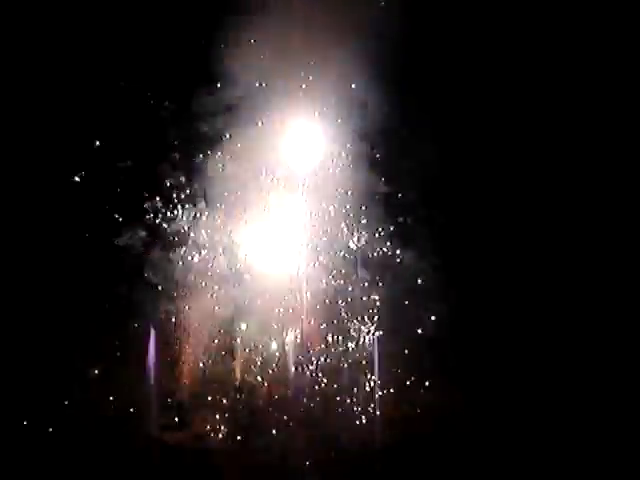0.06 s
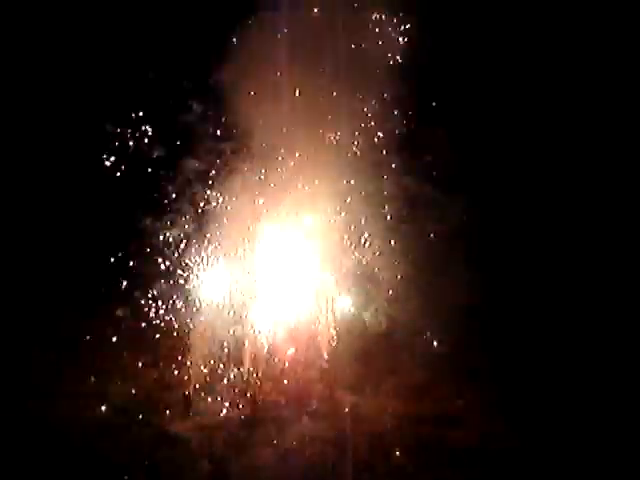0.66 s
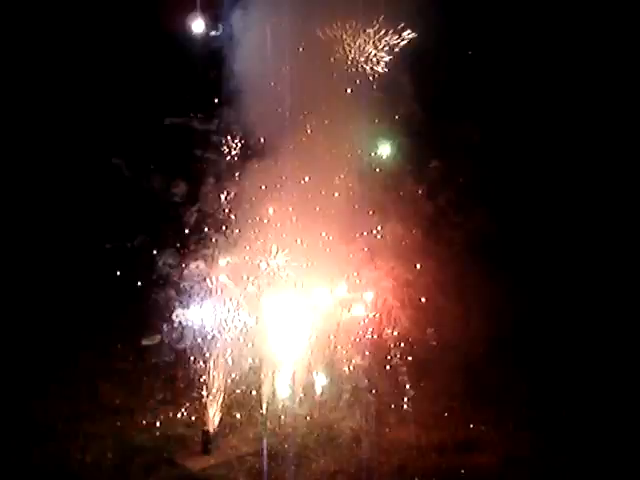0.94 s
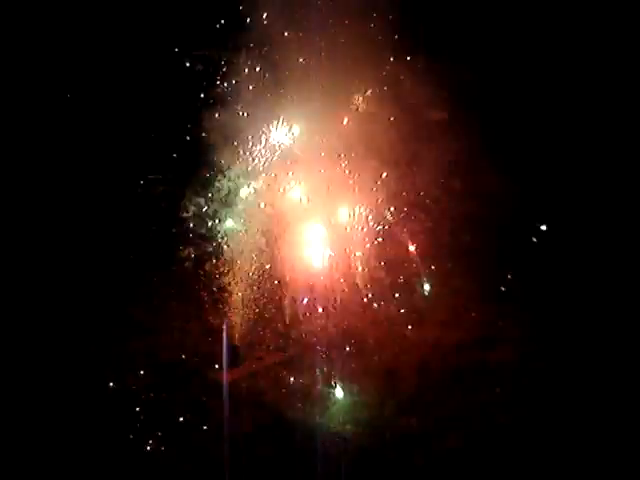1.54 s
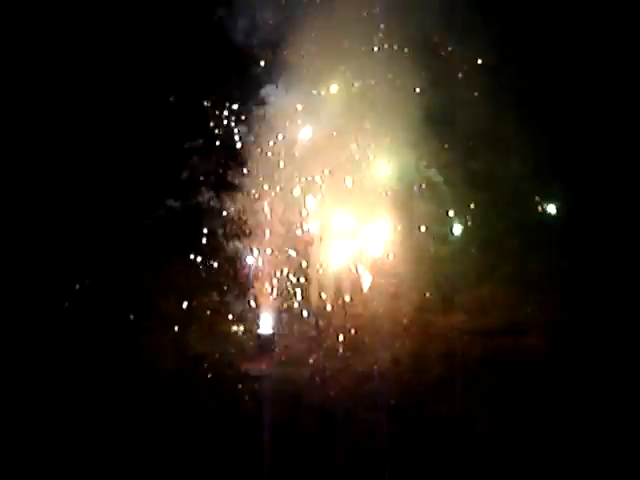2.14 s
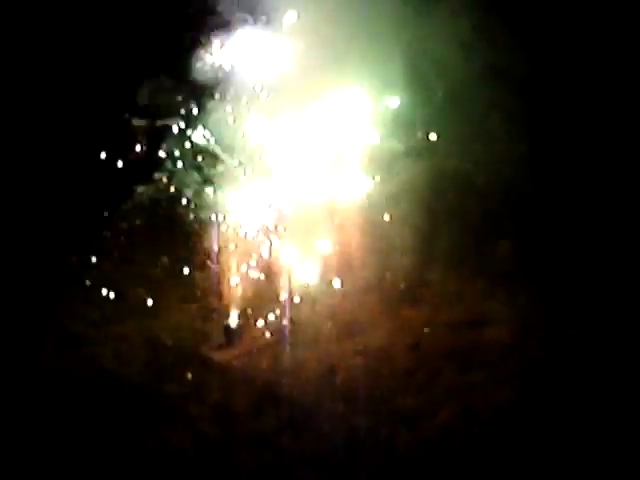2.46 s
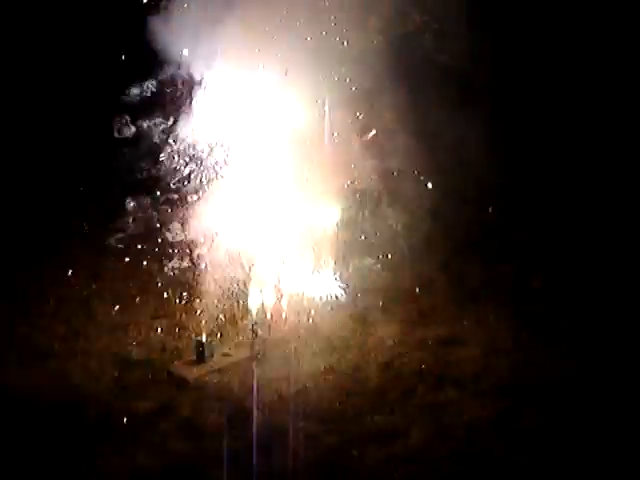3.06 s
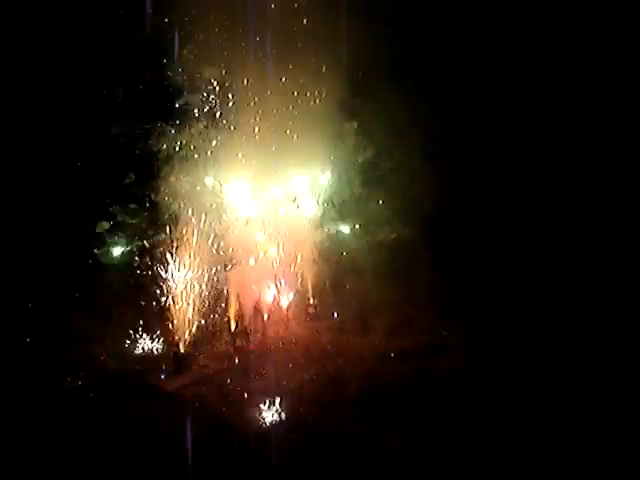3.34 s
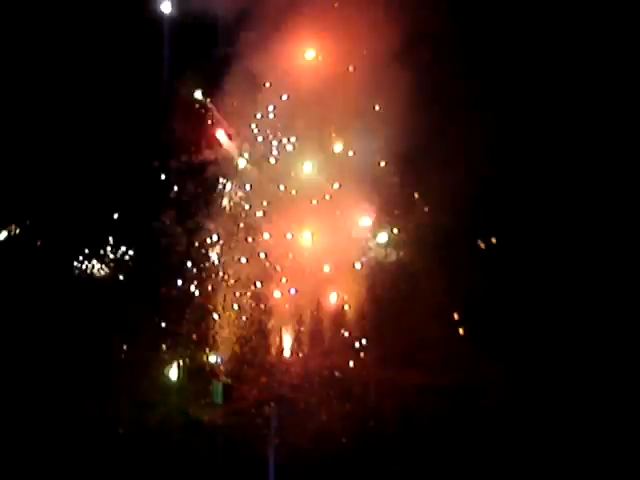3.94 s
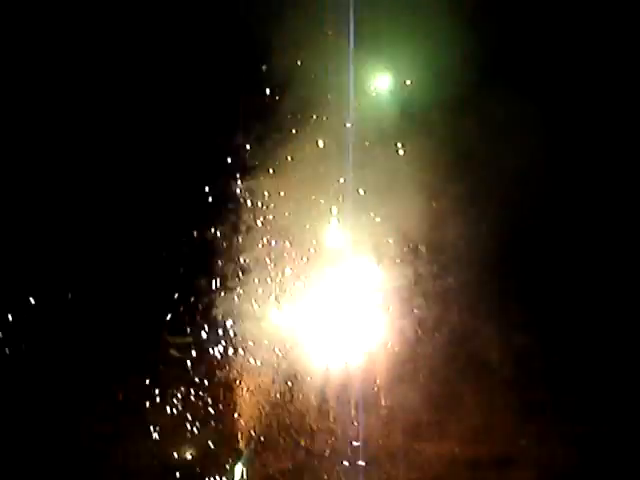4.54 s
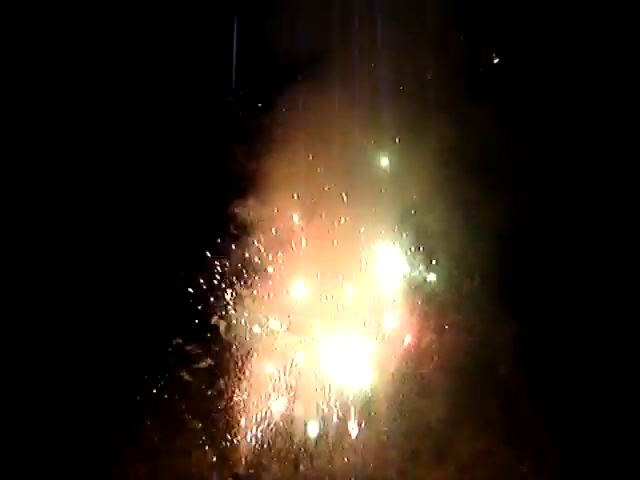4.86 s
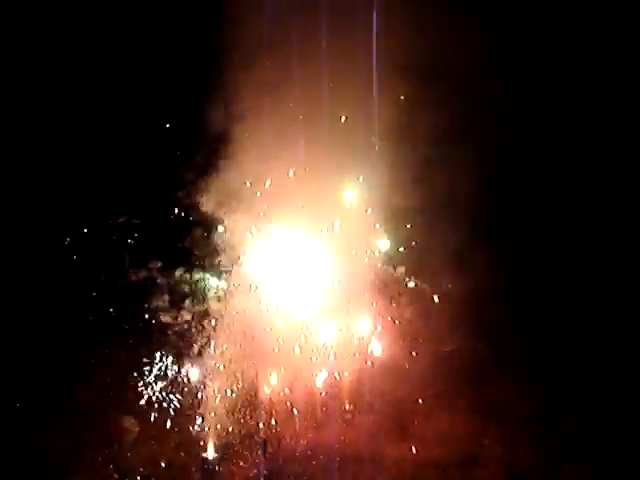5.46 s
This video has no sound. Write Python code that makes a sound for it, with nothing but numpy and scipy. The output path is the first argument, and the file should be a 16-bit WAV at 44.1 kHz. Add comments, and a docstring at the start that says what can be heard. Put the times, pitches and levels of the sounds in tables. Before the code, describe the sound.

Three piercing firework whistles slide down in pitch, followed by louder fountain hiss and rapid, sharp crackling outdoors.

```python
"""Ground fireworks on a lawn at night, a few metres from a small camera's mono microphone.
A whistling tube shrieks at once, sinking in pitch as its fuel burns down, over the hiss of fountains.
Crackling stars pop, each a tiny explosion. From 1.6 s to 3.3 s two more tubes whistle, overlapping.
From 4 s the fountains grow louder and the pops crowd together. Houses and trees return the echoes."""
import sys
import numpy as np
from scipy import signal
from scipy.fft import rfft, irfft, next_fast_len
from scipy.io import wavfile
from scipy.ndimage import uniform_filter1d, map_coordinates

SR = 44100
rng = np.random.default_rng(int(sys.argv[2]) if len(sys.argv) > 2 else 0)


def file_out(sig):
    """Save sig as 16-bit WAV at sys.argv[1]."""
    # one column per channel
    cols = np.atleast_2d(sig).T
    # limit, then scale
    lim = np.clip(cols, -1, 1)
    pcm = np.round(lim * 32767).astype(np.int16)
    wavfile.write(sys.argv[1], SR, pcm)


N = 251811


def amp(db):
    """Decibels as an amplitude factor."""
    return 10 ** (np.asarray(db) / 20)


def unit(x):
    """x scaled to an RMS of one."""
    return x / np.sqrt(np.mean(x ** 2) + 1e-20)


def along(points, hz):
    """Interpolates (f/Hz, value) points on a log frequency axis."""
    f, values = np.transpose(points)
    return np.interp(np.log(hz + 1e-6), np.log(f), values)


def wobble(rate):
    """A smooth random curve, rate knots a second."""
    return map_coordinates(rng.standard_normal(int(N * rate / SR) + 4), [np.arange(N) * rate / SR])


def fuzzy_tone(phase, width_hz):
    """An oscillation of random strength and phase, about width_hz wide."""
    return (wobble(width_hz) * np.sin(phase) + wobble(width_hz) * np.cos(phase)) / np.sqrt(2)


def filtered(x, response):
    """x through a zero-phase filter whose gain is response(hz)."""
    size = next_fast_len(len(x) + SR // 2)
    return irfft(rfft(x, size) * response(np.fft.rfftfreq(size, 1 / SR)), size)[:len(x)]


def coloured(x, points, size=4096):
    """x through a causal filter with the given (f/Hz, gain/dB) points."""
    gain = amp(along(points, np.fft.rfftfreq(size, 1 / SR)))
    cepstrum = irfft(np.log(gain))
    cepstrum[1:size // 2] *= 2
    cepstrum[size // 2 + 1:] = 0
    return signal.fftconvolve(x, irfft(np.exp(rfft(cepstrum))))[:N]


def patchy(x, depth_db):
    """Narrow bands of the hiss brighten and dim at random."""
    spectra = signal.stft(x, nperseg=512)[2]
    patches = uniform_filter1d(rng.standard_normal(spectra.shape), size=3, axis=0)
    patches = uniform_filter1d(patches, size=18, axis=1)
    return signal.istft(spectra * amp(depth_db * unit(patches)), nperseg=512)[1][:N]


def background():
    """A low hum, a rumble and a faint, thin high hiss whose level wavers at random."""
    # steady hum tones: f/Hz, level/dB
    hum_tones = [(29, -64.5), (60, -66)]
    t = np.arange(N) / SR
    hum = sum(amp(db) * np.sqrt(2) * np.sin(2 * np.pi * hz * t) for hz, db in hum_tones)
    rumble = coloured(rng.standard_normal(N), [(30, -12), (150, -25.5), (1000, -44)])
    waver_db = 4.5 * wobble(49)
    hiss = coloured(rng.standard_normal(N), [(2000, -28.5), (6000, 4.5), (10000, -11), (12000, -42)])
    return hum + amp(-63.5) * unit(rumble) + amp(-58.5 + waver_db) * unit(hiss)


def yard(x):
    """Houses and trees around the lawn answer; each frequency dies at its own speed."""
    # reverberation of the yard: f/Hz, time to fall 60 dB/s
    decay_times = [(150, 0.19), (1000, 0.7), (4000, 0.52), (10000, 0.17)]
    hz, t, spectra = signal.stft(rng.standard_normal(SR // 2), SR, nperseg=256)
    decay = amp(-60 * t / along(decay_times, hz)[:, None])
    tail = signal.istft(spectra * decay, SR, nperseg=256)[1]
    return signal.fftconvolve(x, np.pad(tail, (600, 0)) / np.linalg.norm(tail))[:N]


def wall(x, delay_s, blur_t60):
    """One slightly blurred echo from a house front."""
    t = np.arange(SR // 8) / SR
    blur = rng.standard_normal(len(t)) * amp(-60 * t / blur_t60)
    return signal.fftconvolve(x, np.pad(blur, (round(delay_s * SR), 0)) / np.linalg.norm(blur))[:N]


def fountain_db(follows, flaring):
    """A layer's dB over its usual level, following the fountains' level and flares by these factors."""
    # how loud the hiss and pops are heard, lower while the whistles sound: t/s, level/dB
    heard_levels = [(0, -43.5), (.75, -43.5), (1, -46), (1.5, -43), (1.7, -48.5), (2.1, -45), (2.4, -50),
                    (2.8, -45), (3.6, -47.5), (4.15, -44.5), (4.22, -41), (4.62, -41), (4.75, -39),
                    (4.98, -42), (5.15, -37), (5.5, -37.5), (5.71, -35.5)]
    # flares as clusters of stars catch: peak t/s, gain/dB, rise/s, fall/s
    flares = [(1.24, 6, .04, .06), (4.335, 3.5, 0.034, .04), (4.481, 2.5, .025, .03),
              (4.87, 5.5, .08, .045), (5.075, 4.5, .025, .05), (5.62, 4.5, .035, .07)]
    usual_db = -43.5
    t = np.arange(N) / SR
    heard_db = np.interp(t, *np.transpose(heard_levels))
    flare_db = sum(db * np.exp(-((t - peak) / np.where(t < peak, rise, fall)) ** 2)
                   for peak, db, rise, fall in flares)
    return follows * (heard_db - usual_db) + flaring * flare_db


def nozzles():
    """Each nozzle gives a breathy, narrow ring; the higher one stands out when the fountains are loud."""
    phase_per_hz = 2 * np.pi * np.arange(N) / SR
    lower = amp(-50 + fountain_db(follows=.4, flaring=.6)) * fuzzy_tone(2840 * phase_per_hz, 200)
    higher = amp(-55 + fountain_db(follows=1.5, flaring=.5)) * fuzzy_tone(3770 * phase_per_hz, 300)
    return np.sqrt(2) * (lower + higher)


def blasts(times, sizes, push_ms, samples=256):
    """Each tiny explosion is a sharp push of air and a longer suction."""
    age = np.arange(samples) * 1000 / SR / push_ms[:, None]  # in push lengths
    waves = sizes[:, None] * (1 - age) * np.exp(-age) * (1 - np.exp(-age / .1))
    at = np.round(times * SR).astype(int).clip(0)[:, None] + np.arange(samples)
    return np.bincount(at.ravel(), waves.ravel(), minlength=N)[:N]


def shower(count, spread_db, push_ms):
    """Times, sizes and push lengths of many random blasts."""
    when, size, length = rng.random((count, 3)).T
    return when * N / SR, amp(-spread_db * size), push_ms * 2 ** (2 * length - 1)


def fountain_spray():
    """The fountains' jets hiss unevenly, and countless sparks snap in them."""
    # colour of the jets and sparks: f/Hz, gain/dB
    hiss_colour = [(240, -20), (400, -13.5), (568, -0.5), (973, -6.5), (1520, -7), (2820, -5.5),
                   (3140, -6.5), (9600, -17.5), (10000, -22.5), (13000, -41.5), (22000, -120)]
    sparks = unit(blasts(*shower(count=3500, spread_db=7.5, push_ms=.048)))
    fizz = patchy(coloured(rng.standard_normal(N) + .46 * sparks, hiss_colour), depth_db=2.5)
    fizz = filtered(fizz, lambda hz: hz ** 2 / (hz ** 2 + 650 ** 2))  # low cut
    sputter_db = .9 * wobble(90)
    return amp(-37.7 + fountain_db(follows=.96, flaring=.86) + sputter_db) * unit(fizz)


def with_echoes(times, sizes, push_ms, echo_db, spread_s, count=8):
    """Each star bursts at its own place, so things close by return it at its own delays."""
    late, strength = rng.random((len(times), 2, count)).transpose(1, 0, 2)
    delays = .001 - spread_s * np.log(1 - late)
    echo_sizes = amp(echo_db) * sizes[:, None] * (2 * strength - 1) * np.sqrt(1 - late)
    echoes = blasts((times[:, None] + delays).ravel(), echo_sizes.ravel(), np.repeat(push_ms, count))
    return blasts(times, sizes, push_ms) + echoes


def lesser_stars(level_db, count):
    """Times, sizes and push lengths of random stars, denser and louder as the fountains grow louder."""
    gain_db = fountain_db(follows=.9, flaring=.4)
    tally = np.cumsum(amp(gain_db))
    when, sizes, push_ms = shower(count, spread_db=1.5, push_ms=.53)
    at = np.searchsorted(tally / tally[-1], when * SR / N).clip(0, N - 1)
    return at / SR, sizes * amp(level_db + gain_db[at]), push_ms


def crackling_stars():
    """Loud single stars and lesser ones burst over a stream of smaller, duller pops."""
    # loud stars: t/s, blast level/dB, length of the pressure push/ms
    loud_stars = [(0.2091, -15, 0.31), (0.2347, -12.5, .34), (1.0122, -17, 0.5), (1.0789, -14, .3),
                  (1.151, -16, 0.95), (1.2743, -10.5, .5), (1.306, -17.5, 0.46), (1.359, -14, 0.25),
                  (1.3654, -16, .44), (1.3945, -12.5, 0.6), (1.441, -17, 1), (1.5032, -4, 0.25),
                  (1.5086, -7.5, .32), (1.55, -17, 1), (1.7536, -9, 0.15), (2.7828, -19, 0.6),
                  (3.3676, -17, 0.67), (3.59, -18.5, 0.68), (3.665, -17, 0.42), (3.6988, -14, 0.58),
                  (3.7299, -10.5, 0.53), (3.8867, -15.5, .3), (3.974, -10, 0.51), (4.1285, -13.5, 0.26),
                  (4.1868, -10, 0.22), (4.2087, -1, 0.14), (4.213, -17, 1), (4.3559, -13, 0.4),
                  (4.4851, -11.5, 0.52), (4.555, -4, 0.34), (4.5702, -9.5, .55), (4.656, -1.5, .2),
                  (4.7445, -7.5, 0.63), (4.8362, -6, 0.27), (4.856, -9, 0.68), (4.8628, -4, 0.44),
                  (4.8946, -7, 0.42), (4.96, -6, 0.33), (5.0353, -8.5, 0.58), (5.085, -8, 0.65),
                  (5.106, -2, 0.11), (5.193, -3.5, 0.23), (5.293, -1, .36), (5.3027, -6.5, .28),
                  (5.351, -4.5, 0.23), (5.3737, -7, 0.53), (5.3877, -4, 0.32), (5.3963, -6.5, 0.65),
                  (5.421, -8.5, 0.51), (5.4375, -13, 0.59), (5.5503, -3.5, 0.33), (5.604, -5, .14),
                  (5.6389, 0, .11), (5.6764, -2, 0.26), (5.6801, -5.5, .75)]
    # a blast plus its bounce off the lawn, at the microphone: f/Hz, gain/dB
    lawn_bounce = [(40, -34), (90, -17), (140, -6), (290, 2.5), (430, -0.5), (570, -4), (930, 2),
                   (1400, -4), (2500, 0), (5000, 4), (10000, 1)]
    # small stars, dulled by grass and smoke: f/Hz, gain/dB
    dull_colour = [(40, -37), (90, -12.5), (150, -5), (280, 0), (420, -4.5), (570, -7), (900, 3),
                   (1400, -14), (2500, -16.5), (5000, -17.5), (10000, -32.5)]
    times, db, push_ms = np.transpose(loud_stars)
    loud = with_echoes(times, amp(db), push_ms, echo_db=-6, spread_s=.003)
    lesser = with_echoes(*lesser_stars(level_db=-20, count=80), echo_db=-6.5, spread_s=.0039)
    small = with_echoes(*shower(count=1000, spread_db=13, push_ms=.5), echo_db=-5, spread_s=.00513)
    stream = amp(-45.5 + fountain_db(follows=1, flaring=.71)) * unit(coloured(small, dull_colour))
    return coloured(loud + lesser, lawn_bounce) + stream


def whistle(tube, tone_db, rasp_db, jitter, waver, flutter_db):
    """Fuel burns in pulses at the tube's resonance, which sinks as the air column above it lengthens."""
    # rasp of the jet around the tone: f/pitch, gain/dB
    rasp_colour = [(.12, -34.5), (.2, -19.5), (.27, -26), (.4, -13.5), (.55, -9.5), (.7, -8), (.8, -1.5),
                   (.88, -2), (1, 0), (1.13, -8), (1.3, -12.5), (1.45, -4.5), (1.72, -19), (2, -17.5),
                   (2.25, -29)]
    (start, end, first_hz, last_hz, hold, droop, level_db,
     swell, fade, octave_db, mode_db, steepening, cold) = tube
    t = np.arange(N) / SR
    age, left = t - start, end - t
    lit = np.clip(age / .0021 + 1, 0, 1)
    weak_db = 5 * (np.clip(1 - age / swell, 0, 1) + np.clip(1 - left / fade, 0, 1))
    # the jet dies a moment before the tube stops ringing
    blowing = np.clip(left / .047, 0, 1)
    ringing = np.clip(left / .02 + 1, 0, 1)

    # the fuel burns down at a steady rate, so the period lengthens evenly
    burnt = np.clip((age - hold) / (end - start - hold), 0, 1)
    period = (1 - burnt) / first_hz + burnt / last_hz
    last_droop = 1 - droop * np.exp(-left.clip(0) / .032)
    warm_up = 1 - cold * .06 * np.exp(-age.clip(0) / .0025)  # a cold tube chirps up as its gas heats
    hz = last_droop / period * warm_up
    cycles = np.cumsum(hz * (1 + jitter * wobble(700) + waver * wobble(45))) / SR
    phase = 2 * np.pi * cycles

    # pulses alternate, more so in a cold or emptying tube: lines at 0.5 and 1.5 times the pitch
    uneven_db = octave_db + 5.5 * burnt + cold * 20 * np.exp(-age.clip(0) / .055)
    halves = amp(uneven_db) * (fuzzy_tone(phase / 2, 120) + amp(-4) * fuzzy_tone(1.5 * phase, 160))
    lower_mode = amp(mode_db) * fuzzy_tone(.81 * phase, 150)
    wave = np.sin(phase) + blowing * (halves + lower_mode)
    # the loud wave steepens, which adds the octave above and sum and difference tones
    wave = wave + steepening * filtered(wave ** 2, lambda f: f > 650)

    # turbulence rings the same tube, so its colour slides down with the tone
    jet = filtered(rng.standard_normal(N), lambda f: amp(along(rasp_colour, f / first_hz)))
    sliding_jet = map_coordinates(jet, [cycles * SR / first_hz])
    rasp = unit(patchy(sliding_jet, depth_db=.5))
    voice = amp(tone_db) * np.sqrt(2) * wave * ringing + amp(rasp_db) * rasp * blowing
    return lit * amp(level_db - weak_db + flutter_db * wobble(170)) * voice


def whistling_tubes():
    """Three tubes shriek; echoes off a near and a far house front make each flutter as it dies."""
    # tubes: lit t/s, spent t/s, first f/Hz, last f/Hz before the droop, pitch hold/s, droop/share,
    # gain/dB, swell/s, fade/s, octave below/dB, lower mode/dB, steepening/0-1, cold start/0-1
    tubes = [(-0.01, 0.752, 5024, 4107, 0.0011, 0, -20.5, 0.01, 0.025, -22, -21, 0.11, 0.45),
             (1.564, 2.54, 4849, 4016, 0.055, .022, -19.5, 0.0029, 0.37, -27, -18, .18, 0.99),
             (2.282, 3.338, 5176, 4245, 0.15, .035, -20.5, 0.44, 0.0067, -25.5, -15.5, 0.1, 0)]
    shriek = sum(whistle(tube, tone_db=5, rasp_db=-3.5, jitter=.0107, waver=.0035, flutter_db=.56)
                 for tube in tubes)
    near_echo = amp(-15.5) * wall(shriek, delay_s=.028, blur_t60=.019)
    far_echo = amp(-24) * wall(shriek, delay_s=.077, blur_t60=.042)
    return shriek + near_echo + far_echo


def scene():
    """Whistles, pops and hiss in the yard, at one microphone a few metres off."""
    whistles = whistling_tubes()
    whistles = whistles + amp(-21) * yard(whistles)
    pops = crackling_stars()
    pops = pops + amp(-15) * yard(pops)
    mono = whistles + pops + fountain_spray() + nozzles() + background()
    return np.array([mono, mono])


def record(dry):
    """The camera holds loud sound down, rounds off the peaks and keeps nothing above its band limit."""
    threshold_db, ceiling, top_hz = -8, .6, 10180
    loudness = np.sqrt(np.abs(uniform_filter1d(dry ** 2, size=800, axis=1)))
    held = dry / (1 + (loudness / amp(threshold_db)) ** 4) ** (1 / 4)
    rounded = held / (1 + np.abs(held / ceiling) ** 6) ** (1 / 6)
    return np.array([filtered(channel, lambda hz: np.clip((top_hz - hz) / 150, 0, 1))
                     for channel in rounded])


dry = scene()
out = record(dry)
file_out(out)
```